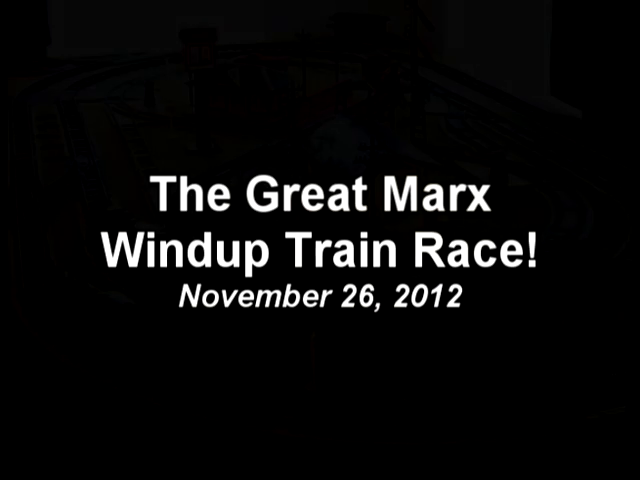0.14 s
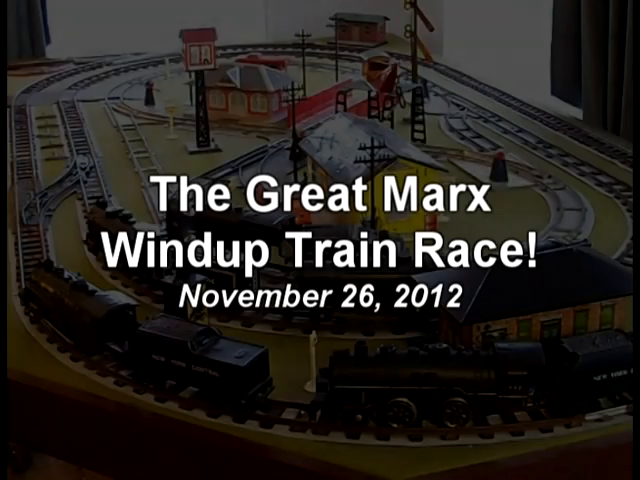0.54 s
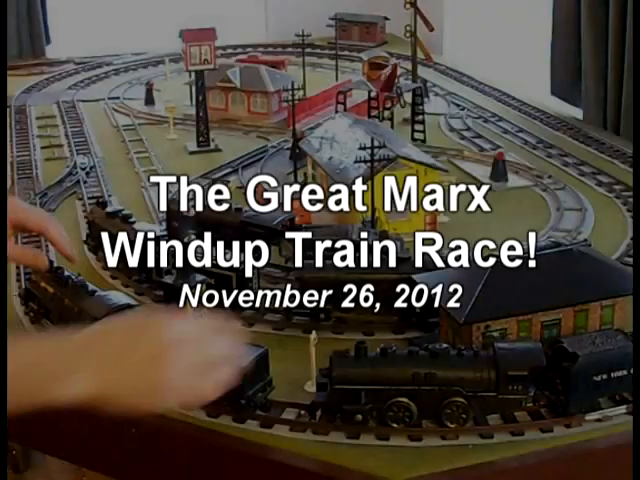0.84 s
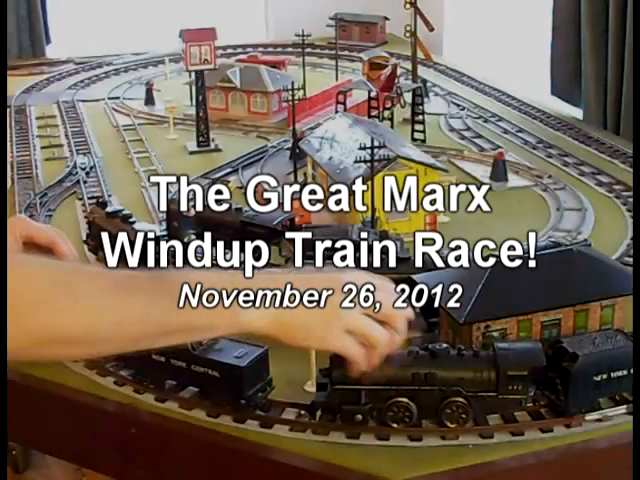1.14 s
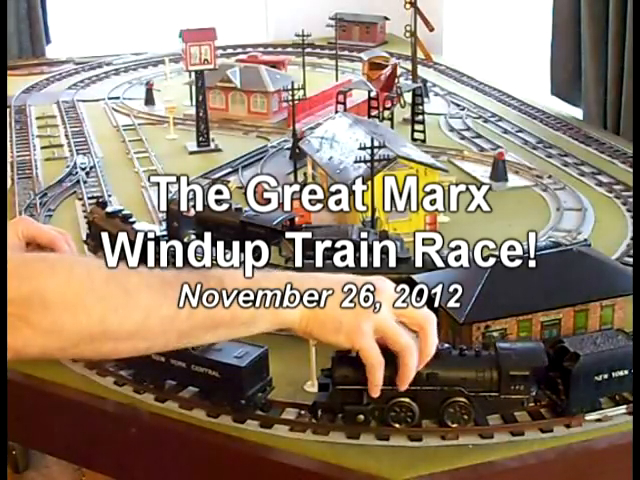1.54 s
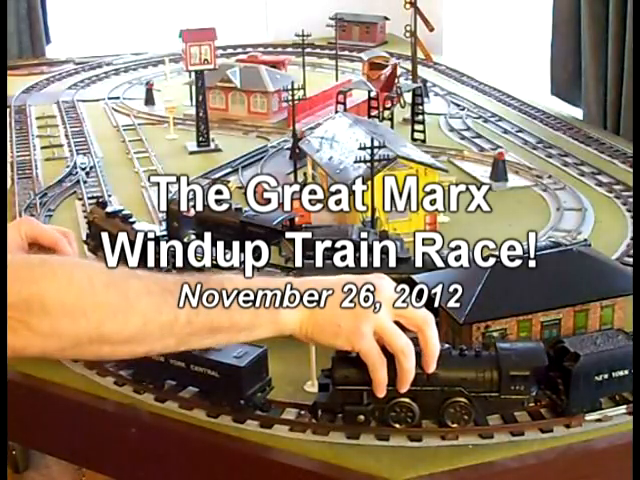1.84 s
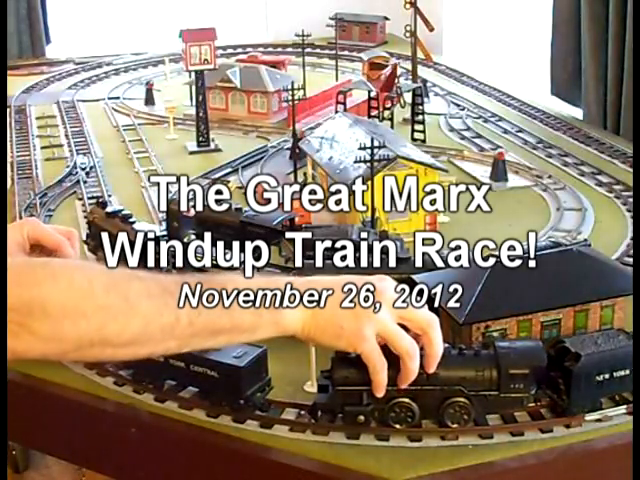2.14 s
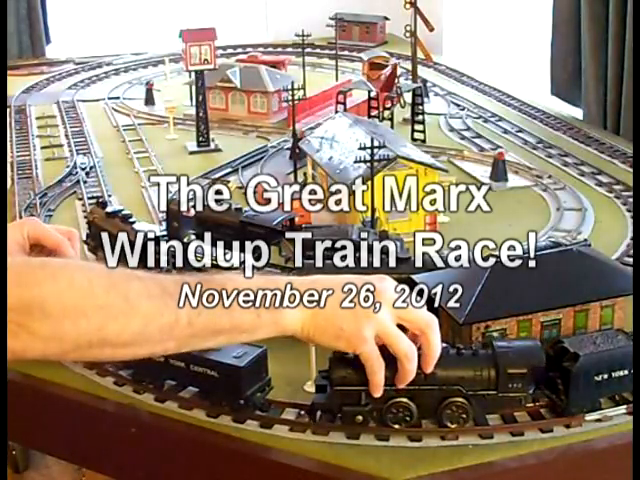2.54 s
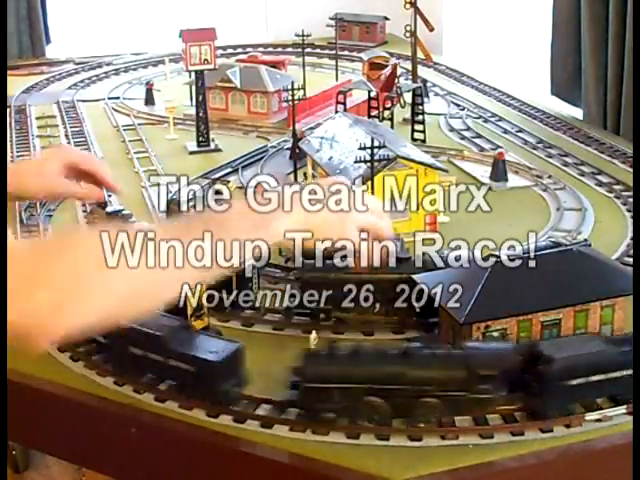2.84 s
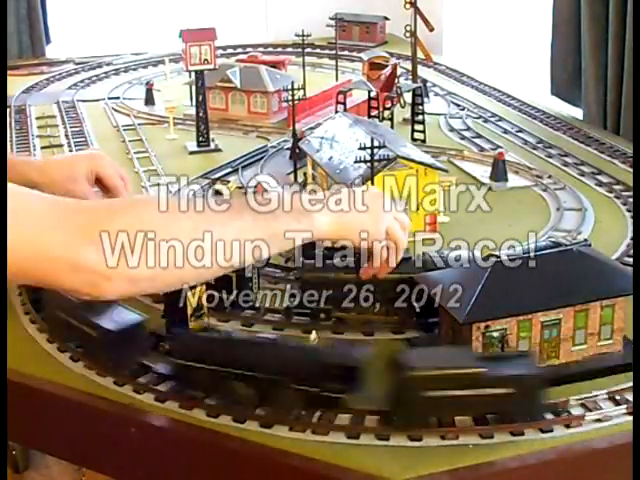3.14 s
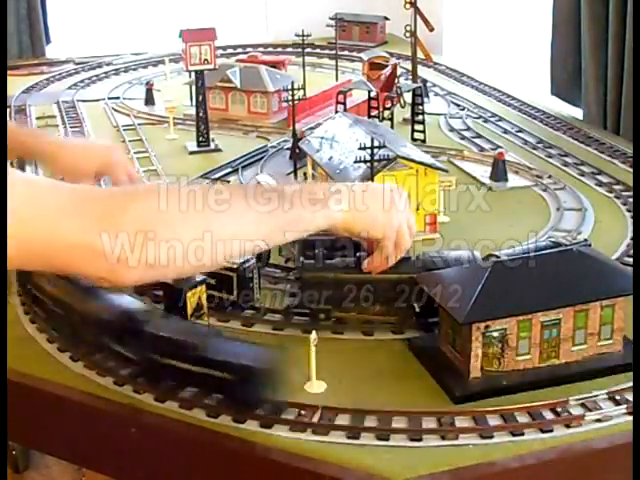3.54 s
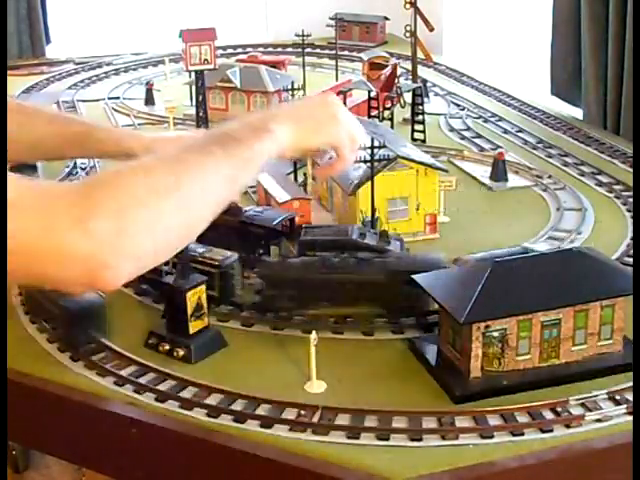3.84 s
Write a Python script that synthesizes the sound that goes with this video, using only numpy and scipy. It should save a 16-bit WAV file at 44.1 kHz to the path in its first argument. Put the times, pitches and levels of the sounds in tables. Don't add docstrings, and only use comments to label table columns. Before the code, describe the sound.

Wind-up tin toy trains are handled, released with a sharp clack, then rattle along metal track

```python
import sys
import numpy as np
from scipy import signal
from scipy.fft import rfft, irfft
from scipy.io import wavfile
from scipy.ndimage import uniform_filter1d

SR = 44100
rng = np.random.default_rng(int(sys.argv[2]) if len(sys.argv) > 2 else 0)


def gain_from_db(level_db):
    decades = np.asarray(level_db, float) / 20
    return 10 ** decades


def wav_record(signal):
    frames = np.transpose(np.atleast_2d(signal))
    bounded = np.clip(frames, -1, 1)
    quanta = np.round(bounded * 32767).astype(np.int16)
    wavfile.write(sys.argv[1], SR, quanta)


N = 176400
T = np.arange(N) / SR


def level(x, db):
    return x * gain_from_db(db) / np.sqrt(np.mean(x ** 2))


def colour(x, points):
    p = np.array(points, float)
    log_hz = np.log(np.arange(2049) * SR / 4096 + 1)
    log_gain = np.interp(log_hz, np.log(p[:, 0]), p[:, 1]) * np.log(10) / 20
    cepstrum = irfft(log_gain)
    cepstrum[1:2048] *= 2
    cepstrum[2049:] = 0
    return signal.fftconvolve(x, irfft(np.exp(rfft(cepstrum))))[:N]


def ring(x, modes):
    out = 0
    for hz, db, t60 in modes:
        pole = np.exp(2j * np.pi * hz / SR - np.log(1000) / (t60 * SR))
        out = out + gain_from_db(db) * signal.lfilter([1], [1, -pole], x).imag
    return out


def walk(rate_hz):
    hold = int(SR / rate_hz)
    steps = np.repeat(rng.standard_normal(N // hold + 1), hold)
    return 1.3 * uniform_filter1d(uniform_filter1d(steps, hold), hold)[:N]


def ticks(per_s, spread_db):
    chance, sign, size = rng.random((3, N))
    contact = (chance < per_s / SR) * np.sign(sign - .5)
    return level(contact * gain_from_db(-spread_db * np.log(1.01 - size)), 0)


def fall(start, decay, rise=0.00091):
    age = np.maximum(T - start, 0)
    return (1 - np.exp(-age / rise)) * np.exp(-age / decay)


def strikes(rows):
    x = np.zeros(N)
    for s, db in rows:
        x[int(s * SR)] += gain_from_db(db)
    return x


# (frequency [Hz], level [dB per Hz])
AIR = [(20, -5.5), (65, -8.5), (96, -6.5), (120, -7), (380, -10.5), (750, -15), (5000, -31), (11000, -47.5)]
# (start [s], end [s])
HUM_SPAN = (0.207, 1.7)


def air():
    hum_hz, hum_db, hum_width_hz = 88.5, -49.5, 5.8
    hiss_db, creep_db_per_s = -41, 1.6
    hum = ring(rng.standard_normal(N), [(hum_hz, 0, 2.6 / hum_width_hz)])
    hum_on = np.clip(np.minimum(T - HUM_SPAN[0], HUM_SPAN[1] - T) / 0.16, .25, 1)
    hiss = level(colour(rng.standard_normal(N), AIR), hiss_db) * gain_from_db(0.51 * walk(3.8))
    return hiss * gain_from_db(creep_db_per_s * np.maximum(T - 1.2, 0)) + hum_on * level(hum, hum_db)


# (time [s], level [dB], decay [s],
# ring [Hz])
HANDLING = [(1.461, -49, 0.035, 2600), (1.503, -47.5, .015, 2700), (1.806, -30.5, 0.0126, 2480),
            (1.812, -34.5, 0.011, 4180), (1.822, -45, 0.017, 2270), (1.86, -48, 0.027, 2390),
            (2.037, -39.5, 0.032, 4820), (2.043, -29, 0.0081, 1960), (2.06, -35, 0.013, 2940),
            (2.072, -32.5, 0.012, 2880), (2.096, -39, 0.021, 2810), (2.125, -47, 0.027, 3600),
            (2.348, -46, 0.017, 2730), (3.1125, -7, .002, 6500)]
# (time [s], level [dB], decay [s], ring [Hz])
LATCHES = [
    (1.446, -35, .006, 3600),
    (2.7945, -33, .012, 2400),
    (2.8545, -35, .008, 4000),
]
# (frequency [Hz], level [dB])
HAND_BROAD = [(150, -1.5), (500, 1), (1500, -3.5), (4000, -7.5), (7000, -11.5), (10000, -12.5)]
# (time [s], level [dB])
THUMPS = [
    (1.812, -44.5),
    (1.838, -48.5),
    (2.05, -52),
]
# (frequency [Hz], level [dB], t60 [s])
TABLE = [(66, -12, 0.076), (82.6, -16, 0.33), (221, -9.5, 0.22), (322.6, -9.5, 0.26), (384.5, -18.5, 0.15),
         (482, -7, 0.091), (566, -8.5, 0.26)]
# (time [s], level [dB], frequency [Hz], decay [s])
TABLE_BOUNCE = (1.8242, -23.5, 74, .025)


def handling():
    ring_db, ring_width = -0.5, 0.39
    touch = ticks(8000, 2.5)
    broad = level(colour(touch, HAND_BROAD), 0)
    out = 0
    for s, db, decay, hz in HANDLING + LATCHES:
        tin = level(ring(touch, [(hz, 0, 2.6 / (ring_width * hz))]), ring_db)
        out = out + gain_from_db(db) * fall(s, decay, rise=.0012) * (tin + broad)
    push = uniform_filter1d(strikes(THUMPS), size=40) * 10
    s, db, hz, decay = TABLE_BOUNCE
    bounce = gain_from_db(db) * fall(s, decay, rise=.015) * np.sin(2 * np.pi * hz * (T - s))
    return out + ring(push, TABLE) + bounce


# (time [s], peak [dB], ring [Hz])
TAPS = [(1.4465, -36, 2520), (1.452, -37, 3000), (1.459, -47, 1780), (1.4664, -41, 3000),
        (1.5053, -44, 3000), (1.5193, -46, 1800), (1.8014, -48, 714), (1.8115, -28, 600),
        (1.8125, -28.5, 2360), (1.8222, -37, 1200), (1.8249, -31, 2400), (1.8277, -44, 850),
        (1.8317, -41, 1215), (1.8394, -46, 1005), (1.8498, -39, 1430), (1.8619, -40, 2400),
        (2.0484, -45, 1400), (2.0513, -40, 690), (2.0514, -24.5, 3320), (2.0554, -42, 1700),
        (2.0609, -26, 2830), (2.0642, -42, 850), (2.0719, -35, 4780), (2.0734, -22, 2480),
        (2.0761, -40, 1210), (2.0839, -36, 1690), (2.0879, -40, 597), (2.0899, -41, 3390),
        (2.0919, -34, 1730), (2.0983, -26, 2850), (2.1048, -44, 1020), (2.1063, -35.5, 2020),
        (2.3495, -43, 2520), (2.3729, -43, 1760), (2.7165, -37, 2120), (2.7399, -33, 2220),
        (2.7524, -43, 2120), (2.8148, -31.5, 1400), (2.858, -35, 1200), (2.8753, -30.5, 976),
        (2.8847, -29, 980), (2.9022, -29, 1980), (2.9109, -41, 825), (2.9182, -36, 2800),
        (2.9252, -37, 1980), (2.9764, -26, 2870), (3.0238, -19, 1964), (3.03, -24, 1190),
        (3.0303, -25, 2850), (3.0437, -29, 2330), (3.0527, -26, 1010), (3.0572, -26, 2370),
        (3.0619, -25, 1180), (3.0672, -20, 1930), (3.0777, -27, 1980), (3.079, -23.5, 702),
        (3.0921, -22, 2000)]
# (time [s], peak [dB], ring [Hz])
CLANKS = [(3.2348, -20, 990), (3.2395, -25.5, 830), (3.2768, -15, 2770), (3.2857, -15, 2380),
          (3.2981, -21.5, 1430), (3.3192, -16, 4660), (3.3227, -16, 2400), (3.3291, -25, 1670),
          (3.3391, -15, 2370), (3.3401, -20, 970), (3.3448, -30, 820), (3.3546, -18, 2840),
          (3.357, -16.5, 1380), (3.4186, -13.5, 1230), (3.4219, -14, 2800), (3.4508, -12, 2770),
          (3.4653, -19, 3330), (3.4753, -18, 1660), (3.5119, -20, 1165), (3.5276, -16, 2890),
          (3.5341, -14.5, 2830), (3.5375, -27, 687), (3.5461, -16, 3260), (3.552, -21, 1420),
          (3.5631, -24, 1650), (3.5633, -23, 830), (3.572, -18.5, 1980), (3.5737, -33, 850),
          (3.6098, -24, 1400), (3.6438, -17, 2000), (3.6475, -31, 830), (3.6508, -15, 2366),
          (3.6767, -24, 1400), (3.7112, -16, 1680), (3.7281, -13, 1980), (3.739, -22, 1400),
          (3.7441, -20, 2380), (3.7543, -21, 1190), (3.7636, -14, 2750), (3.7765, -14, 1670),
          (3.8009, -21, 4500), (3.8116, -17, 1185), (3.8396, -24, 1210), (3.8478, -17.5, 1680),
          (3.8543, -20, 2350), (3.8748, -21, 3320), (3.8897, -22, 1660), (3.9037, -20, 2313),
          (3.9074, -23, 1200), (3.9346, -16, 1990), (3.9368, -21, 837), (3.9549, -20, 1645),
          (3.9551, -18, 1680), (3.9853, -22, 1370), (3.9874, -19, 2830)]


def clanks(rows):
    gain_db, decay_cycles, rise_s, edge_db, edge_decay_s = 4, 5.4, .0003, 0, 0.0017
    length = 1024
    out, age = np.zeros(N + length), T[:length]
    grit = uniform_filter1d(rng.standard_normal((len(rows), length)), size=5)
    for (s, db, hz), rough in zip(rows, grit):
        body = np.sin(2 * np.pi * hz * age) * np.exp(-age * hz / decay_cycles)
        edge = gain_from_db(edge_db) * rough * np.exp(-age / edge_decay_s)
        start = int(s * SR)
        out[start:start + length] += gain_from_db(db + gain_db) * (1 - np.exp(-age / rise_s)) * (body + edge)
    return out[:N]


def pings(push):
    per_s, first_db, width = 160, -12, .13
    out = 0
    for k, hz in enumerate(950 * 1.27 ** np.arange(8)):
        part = ring(ticks(per_s, 3.3), [(hz, 0, 0.62 / (width * hz))])
        out = out + level(part, first_db - 1.1 * k) * push
    return out


# (time [s], clatter [dB], table drone [dB], treble [dB])
RUN = [(2.79, -60, -55, -4), (2.798, -44, -56, -9), (2.85, -39, -40, -2), (2.93, -33, -46, -2.5),
       (2.98, -31, -53, 3), (3.015, -30, -48, 3), (3.09, -21.5, -56, 0.5), (3.165, -28, -44, 1.5),
       (3.23, -21, -54, 2.5), (3.4, -21, -41, 3), (3.62, -19.5, -37, 1.5), (3.7, -19.5, -31, 1.5),
       (3.8, -20, -30.5, 2), (3.9, -18, -30.5, 1), (3.95, -20, -28, 1), (4.0, -19.5, -24.5, 1)]
# (frequency [Hz], level [dB])
CLATTER = [(60, -17.5), (160, -15.5), (250, -5.5), (465, -5.5), (1200, -4.5), (2500, -6), (5200, -14),
           (11000, -28.5)]
# (frequency [Hz], level [dB], t60 [s])
SHELL = [(790, -6, .12), (940, -3, .12), (1240, 0, .12), (1558, -3, .1), (1968, -5, .08), (2496, -4, .09),
         (2860, -7, .06)]
# (time [s], peak [dB])
JOINTS = [
    (2.943, -16),
    (3.02, -20),
    (3.1095, -2.5),
    (3.134, -1.5),
    (3.273, -12.5),
    (3.334, -8),
    (3.521, -6),
    (3.719, -5),
]
# (time [s], level [dB])
KNOCKS = [
    (3.03, -39),
    (3.235, -33.5),
    (3.7, -33.5),
]
# (frequency [Hz], level [dB], t60 [s])
BOX = [(380, -7, 0.26), (468, -12, 0.424), (950, -17, 0.13)]
# (frequency [Hz], level [dB], t60 [s])
DRONE = [(61, 1, .6), (81, 0, .4)]


def trains():
    tooth_hz, tooth_depth = 241, 0.14
    joint_db, joint_decay_s, shell_db = -12.5, 0.015, -15
    board_hz, board_db, board_wobble_db = 216, 4.5, 2.5
    run_s, clatter_db, drone_db, treble_db = np.array(RUN).T

    speed = np.clip((T - 2.75) / .6, .2, 1)
    tooth_rate = tooth_hz * speed * (1 + 0.0377 * walk(10))
    teeth = 1 + tooth_depth * np.sin(2 * np.pi * np.cumsum(tooth_rate) / SR)
    drive = ticks(3500, 2.6) * teeth * gain_from_db(1.65 * walk(60))
    push = gain_from_db(np.interp(T, run_s, clatter_db, left=-90))
    for s, db in JOINTS:
        push = push + gain_from_db(db + joint_db) * fall(s, joint_decay_s, rise=0.0035)

    shaken = drive * push
    rails = colour(shaken, CLATTER) / np.std(colour(drive, CLATTER))
    shells = ring(shaken, SHELL) / np.std(ring(drive, SHELL))
    clatter = rails + gain_from_db(shell_db) * shells + pings(push)
    treble = signal.sosfilt(signal.butter(2, 2500, 'high', fs=SR, output='sos'), clatter)
    clatter = clatter + (gain_from_db(np.interp(T, run_s, treble_db)) - 1) * treble
    clatter = clatter + ring(uniform_filter1d(strikes(KNOCKS), size=30) * 10, BOX)

    board_phase = 2 * np.pi * np.cumsum(board_hz * (1 + 0.015 * walk(12))) / SR
    board = gain_from_db(board_db + board_wobble_db * walk(24.67)) * np.sin(board_phase)
    rumble = level(np.gradient(ring(rng.standard_normal(N), DRONE)), 0)
    return clatter + (rumble + board) * gain_from_db(np.interp(T, run_s, drone_db, left=-90))


# (time [s], level [dB], frequency [Hz], decay [s])
CHIRPS = [
    (2.943, -37, 4000, .01),
    (2.958, -35, 4750, .012),
    (2.976, -32, 5050, .03),
    (3.375, -28, 5060, .025),
]
# (time [s], level [dB])
STROKES = [
    (3.1005, -12),
    (3.8, -19),
]
# (frequency [Hz], level [dB], t60 [s])
BELL = [(2725, 0, .8), (4550, -8, .6), (7460, -13, .4), (9480, -14, .15)]
# (frequency [Hz], level [dB], t60 [s])
SECOND_BELL = [(2860, -2, .12), (4550, -2, .2), (7460, -7, .15)]


def bell():
    mute_s, mute_decay_s = 3.14, .008
    chirp_upper, chirp_upper_db, chirp_width_hz = 1.41, -3, 130
    rub = rng.standard_normal(N)
    muted = np.exp(-np.maximum(T - mute_s, 0) / mute_decay_s) * gain_from_db(2 * walk(230))
    out = muted * ring(strikes(STROKES[:1]), BELL) + ring(strikes(STROKES[1:]), SECOND_BELL)
    t60 = 2.2 / chirp_width_hz
    for s, db, hz, decay in CHIRPS:
        pair = ring(rub, [(hz, 0, t60), (chirp_upper * hz, chirp_upper_db, t60)])
        out = out + fall(s, decay, rise=.003) * level(pair, db + 3)
    return out


def bell_glide():
    peak_s, peak_db, half_s = 3.1133, -2.5, .0025
    hz, rise_hz_per_s = 2520, 40000
    age = T - peak_s
    swell = gain_from_db(peak_db) * np.exp(-.5 * (age / half_s) ** 2)
    return swell * np.sin(2 * np.pi * (hz * age + rise_hz_per_s * age ** 2 / 2))


def scene():
    room_t60_s, room_db = 0.32, -10
    near = handling() + clanks(TAPS + CLANKS) + trains()
    age = T[:SR // 2]
    tail = rng.standard_normal(len(age)) * np.exp(-np.log(1000) * age / room_t60_s) * (age > .004)
    wet = signal.fftconvolve(near, tail / np.sqrt(np.sum(tail ** 2)))[:N]
    return (near + gain_from_db(room_db) * wet + bell() + bell_glide() + air())[None]


def low_pass(x):
    return signal.sosfilt(signal.butter(12, 11020, fs=SR, output="sos"), x)


# (start [s], end [s], depth [dB])
DIVES = [
    (3.0985, 3.1635, -19),
    (3.0985, 3.111, -7),
    (3.116, 3.133, -6),
    (3.139, 3.157, -5),
    (3.192, 3.208, -6),
]
# (frequency [Hz], level [dB])
MIC = [(4500, -1.5), (5600, -3), (6800, -6), (8000, -16), (9500, -24.5), (10500, -37), (11000, -60),
       (11600, -91)]


def record(dry):
    dive_in_s, dive_out_s, dive_offset, limit = .001, .001, -.007, .34
    notch_hz, notch_width_hz, notch_share = 6050, 750, .93
    gain_db = 0
    for start, end, db in DIVES:
        edges = np.minimum((T - start) / dive_in_s, (end - T) / dive_out_s)
        gain_db = gain_db + db * np.clip(edges, 0, 1)
    x = dry[0] * gain_from_db(gain_db) + dive_offset * uniform_filter1d(1. * (gain_db < -12), size=300)
    x = x * np.clip((T[-1] - T) / .001, 0, 1)
    x = colour(limit * np.tanh(x / limit), MIC)
    notched = signal.lfilter(*signal.iirnotch(notch_hz, notch_hz / notch_width_hz, fs=SR), x)
    mix = (x + notch_share * (notched - x))[None]
    return low_pass(mix)


dry = scene()
out = record(dry)
wav_record(out)
```